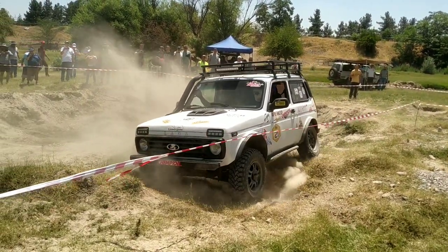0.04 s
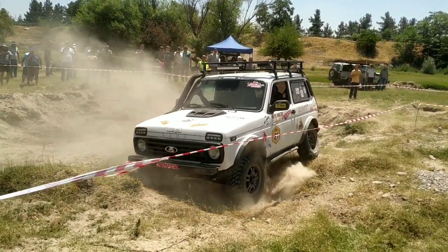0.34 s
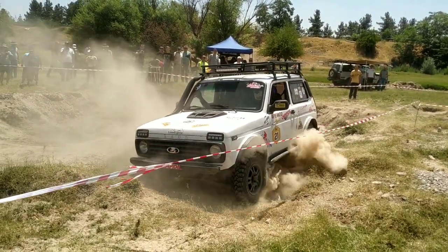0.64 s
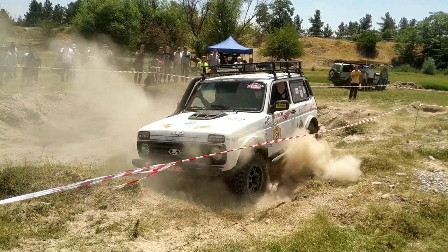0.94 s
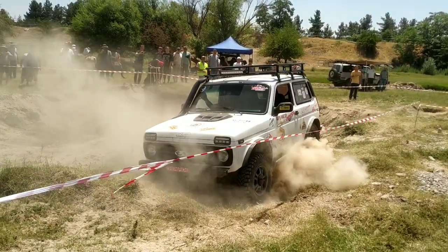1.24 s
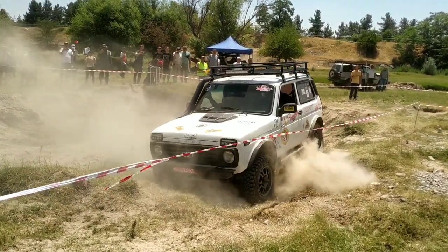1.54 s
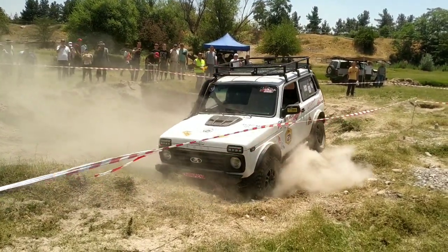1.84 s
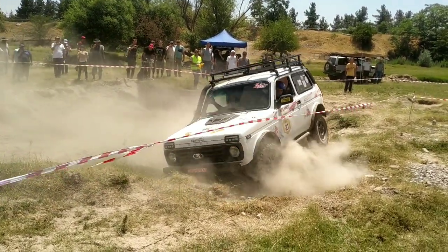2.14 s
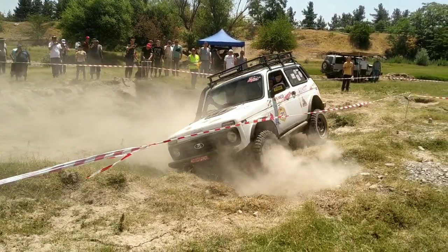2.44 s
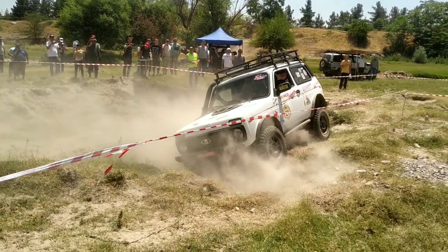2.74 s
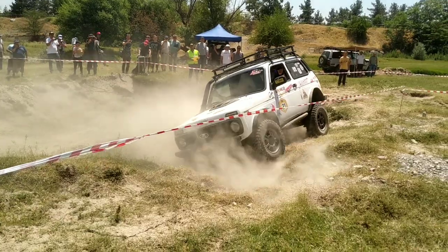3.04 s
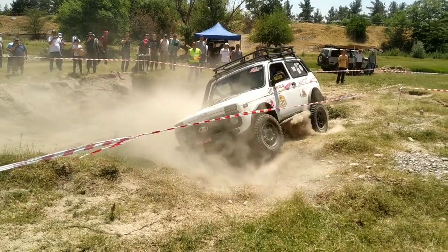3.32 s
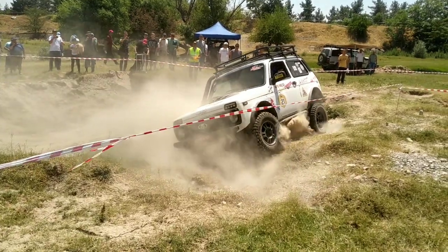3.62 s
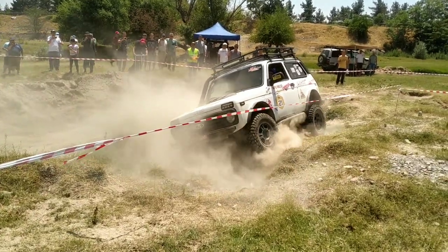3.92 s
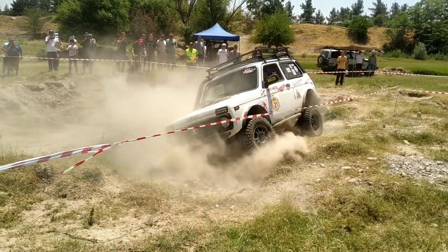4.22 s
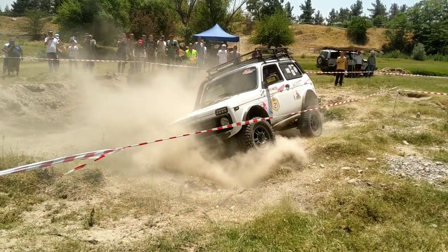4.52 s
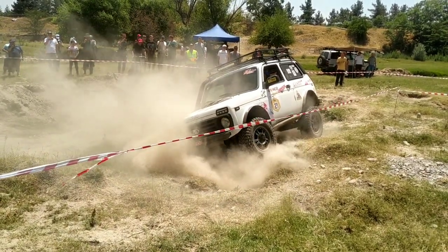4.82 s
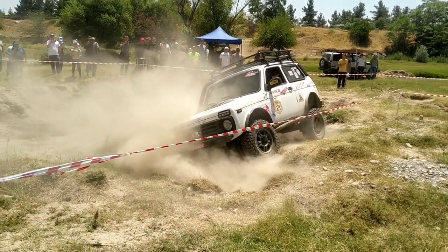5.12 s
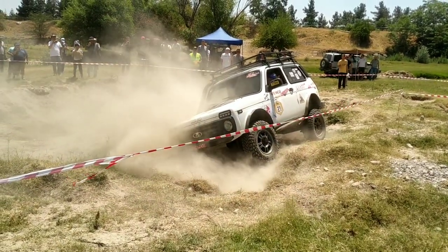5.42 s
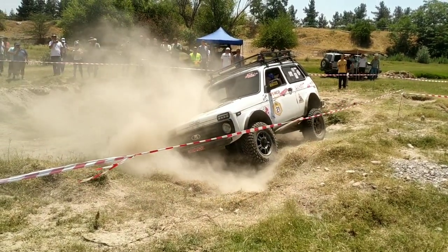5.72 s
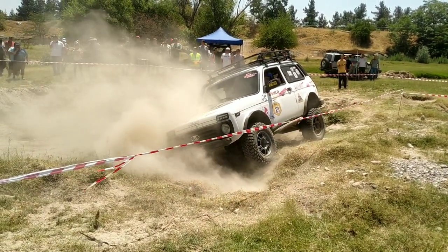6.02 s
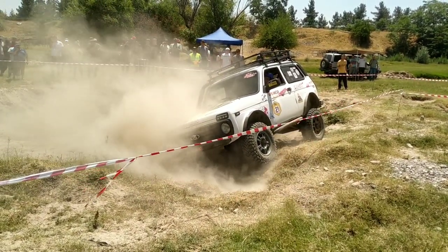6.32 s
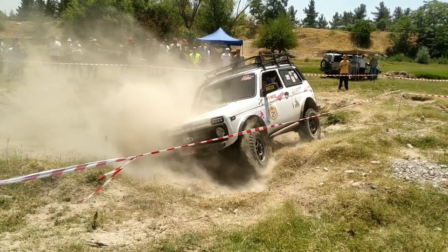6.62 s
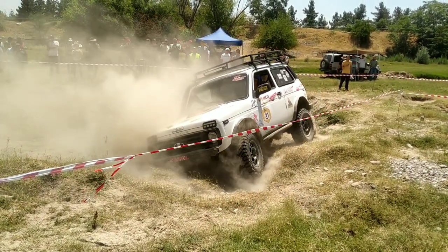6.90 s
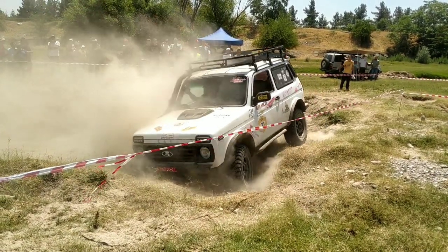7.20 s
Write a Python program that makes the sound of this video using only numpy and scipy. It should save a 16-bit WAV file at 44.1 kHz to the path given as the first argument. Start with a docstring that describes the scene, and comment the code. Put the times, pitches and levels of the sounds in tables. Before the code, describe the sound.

A small off-road car revs hard a few metres away, slightly to the right, with a booming exhaust, engine clatter, hiss and a whine. Its tyres scrub and spray dry grit, then the revs sink and stones crack against the body. A second, wavering rev brings brief squeals before the engine drops to idle, and a third rev climbs at the end. Outdoor wind rumbles and thumps on the microphone from the first drop onward.

```python
"""Off-roader climbing out of a dirt hollow

A small four-cylinder, a few metres off and a little to the right, revs three times and idles between. The
exhaust booms at the firing rate, the engine clatters and hisses, and its alternator whines. Spinning tyres
scrub and fling dry dirt and stones, and brief squeals ring out. Wind buffets the microphone's two ports."""
import sys
import numpy as np
from scipy import signal
from scipy.fft import rfft, irfft, next_fast_len
from scipy.io import wavfile
from scipy.ndimage import uniform_filter1d

SR = 44100
rng = np.random.default_rng(int(sys.argv[2]) if len(sys.argv) > 2 else 0)


def inscribe(sig):
    """Save sig as 16-bit PCM at rate SR to the path in sys.argv[1].

    A 1-D sig is mono; a 2-D sig holds one channel per row.
    Samples are clipped to [-1, 1] before scaling.
    """
    pcm = np.round(np.clip(np.atleast_2d(sig).T, -1, 1) * 32767)
    wavfile.write(sys.argv[1], SR, pcm.astype(np.int16))


N = 324576
T = np.arange(N) / SR
WORKING_HZ = 100  # firing rate that the engine's levels refer to

# Tone of an eddy striking a microphone port. Each row: frequency in Hz, gain in dB.
EDDY_SPECTRUM = [(30, 6.5), (150, 7), (400, -3), (1150, -13), (2600, -49)]


def undb(db):
    """Decibels to gain."""
    return 10 ** (np.asarray(db) / 20)


def curve(table):
    """Rows of (seconds, value), joined by straight lines."""
    return np.interp(T, *np.array(table, float).T)


def unit(x):
    """Scale to rms 1."""
    return x / np.sqrt(np.mean(x ** 2))


def tone(turns):
    """Sine of rms 1."""
    return np.sqrt(2) * np.sin(2 * np.pi * turns)


def colour(x, points):
    """Causal filter with the given (Hz, dB) response."""
    hz, db = np.array(points, float).T
    size = next_fast_len(x.shape[-1] + 8192, True) // 2 * 2
    bin_hz = np.arange(size // 2 + 1) * SR / size
    log_gain = np.log(undb(np.interp(np.log(bin_hz + 1), np.log(hz), db)))
    cepstrum = irfft(log_gain)
    cepstrum[1:size // 2] *= 2
    cepstrum[size // 2 + 1:] = 0
    return irfft(rfft(x, size) * np.exp(rfft(cepstrum)))[..., :x.shape[-1]]


def walk(rate):
    """Smooth random wander of rms 1, taking `rate` steps a second."""
    steps = rng.standard_normal(N // 10)
    path = np.interp(T * rate, np.arange(len(steps)), steps)
    return unit(uniform_filter1d(path, int(SR / rate) + 1))


def clicks(times, sizes):
    """Impulses at the given moments."""
    at = np.round(times * SR).astype(int)
    inside = (at >= 0) & (at < N)
    return np.bincount(at[inside], sizes[inside], N)


def pair(make, alike):
    """Two draws of a random sound, one for each port, partly blended."""
    both = np.array([make(), make()])
    return unit(both + alike * both[::-1])


def scatter(x, t60, wet_db):
    """Dense short reflections from metal and ground, different for each port."""
    t = T[:SR // 4]
    tails = rng.standard_normal((2, len(t))) * undb(-60 * t / t60)
    tails /= np.sqrt(np.sum(tails ** 2, axis=1, keepdims=True))
    return x + undb(wet_db) * signal.fftconvolve(x[None], tails, axes=1)[:, :N]


def firing_hz():
    """Engine speed: two revs, a spell of idling and a third rev."""
    # Each row, in all four: time in seconds, firing rate in Hz.
    first_rev = [(0.0, 116.7), (.21, 121.5), (.35, 136.3), (.42, 139.7), (.59, 128.1), (.71, 130),
                 (.82, 119.7), (.98, 127.2), (1.15, 118.1), (1.61, 93.9), (1.95, 75.02), (2.28, 63.95),
                 (2.57, 56.93), (2.76, 50.3)]
    second_rev = [(2.81, 56.65), (2.916, 75.1), (3.016, 89.07), (3.208, 83.3), (3.406, 100.9),
                  (3.556, 91.54), (3.676, 102.4), (3.876, 73.2), (4.3, 55.8)]
    idle = [(4.48, 45.14), (6.09, 43.02)]
    third_rev = [(6.175, 63), (6.302, 91.2), (6.462, 105.8), (6.666, 84.3), (6.84, 92.55), (6.998, 86.7),
                 (7.094, 94.85), (7.226, 116.6), (7.36, 123.9)]
    return curve([*first_rev, *second_rev, *idle, *third_rev])


def overrun():
    """0 while the accelerator is held down, 1 while it is released."""
    # Accelerator down. Each row: start and end in seconds.
    presses = [(-1, 1.317), (3, 3.88), (6.5, 8)]
    held = sum((T > start) & (T < end) for start, end in presses)
    return uniform_filter1d(1. - held, SR // 6)


def effort(db, db_per_octave, overrun_db, idle_db):
    """Gain of an engine noise: it grows with speed from an idling floor and eases off the throttle."""
    octaves = np.log2(firing_hz() / WORKING_HZ)
    return undb(db + db_per_octave * octaves + overrun_db * overrun()) + undb(idle_db)


def silencer_db(pull_db=2.5, full_pull_hz_per_s=480):
    """The silencer booms most at middle speeds; a hard pull swells it, and now and then it drops out."""
    # The silencer's response. Each row: firing rate in Hz, level in dB.
    response = [(44, -22), (51, -17), (61, -14.5), (84, -12), (96, -14), (108, -20), (124, -22.5),
                (140, -18.5)]
    # Brief dips in the boom. Each row: centre in seconds, depth in dB, half width in seconds.
    dropouts = [(.58, -10, 0.033), (2.79, -16, 0.021), (3.69, -6, 0.022), (4.32, -9, 0.12)]
    hz, db = np.array(response, float).T
    pickup = np.gradient(firing_hz()) * SR
    pull = uniform_filter1d(np.clip(pickup / full_pull_hz_per_s, 0, 1), SR // 20)
    dips = sum(depth * np.exp(-((T - centre) / width) ** 2 / 2) for centre, depth, width in dropouts)
    return np.interp(firing_hz(), hz, db) + pull_db * pull + dips


def exhaust(firings, open_hz=94.5, overrun_db=-6):
    """The silencer leaves a nearly pure, uneven boom; overtones come up as the throttle opens."""
    # The pipe's other notes. Each row: multiple of the firing rate, relative level in dB.
    orders = [(.5, -26.5), (2, -29.5), (3, -34), (4, -40), (7, -42.5)]
    rate, easing = firing_hz(), overrun()
    strength = np.minimum(rate / open_hz, 1) ** 1.57
    strength *= np.minimum(WORKING_HZ / rate, 1) ** 2  # the silencer swallows the higher notes
    # Near idle the firings stumble, and the pipe rings at twice their rate.
    idling = np.clip((54 - rate) / 8, 0, 1)
    stumble = firings + (.009 + .1 * idling) * walk(25)
    boom = (tone(stumble) * (1 - .75 * idling) + .45 * idling * tone(2 * stumble)) * undb(silencer_db())
    overtones = 0
    for multiple, db in orders:
        gain = undb(db + overrun_db * easing + 3 * walk(30))
        uneven_firings = firings + .012 * walk(60)
        overtones += gain * tone(multiple * uneven_firings + rng.random())
    return boom * undb((.7 + .5 * idling) * walk(40)) + overtones * strength


def clatter(firings, count=96):
    """Valves, pistons and chain knock at the same crank angles in every cycle of four firings."""
    # Tone of the engine bay. Each row: frequency in Hz, gain in dB.
    bay = [(30, 7), (140, 1), (260, -6), (390, -8), (680, -3.5), (950, -9), (1270, -4.5), (1650, -9.5),
           (1900, -6.5), (2040, -13), (2280, -6), (2900, -9), (3400, -17), (7000, -48.5)]
    angles, weights = rng.random(count), rng.standard_normal(count)
    cycles = np.arange(N // 1000)[:, None]
    slip, force = rng.standard_normal((2, len(cycles), count))
    times = np.interp(4 * (cycles + angles), firings, T, right=-1) + .00003 * slip
    knocks = clicks(times.ravel(), (weights * undb(2 * force)).ravel())
    knocks = unit(knocks / np.sqrt(firing_hz()))
    intake_rush = unit(rng.standard_normal(N) * (1 + .047 * np.cos(2 * np.pi * firings)))
    return unit(colour(scatter(knocks + .75 * intake_rush, t60=.025, wet_db=-10), bay))


def alternator(firings, turns_per_firing=.745):
    """A belt-driven whine rings the engine bay and fades at low speed; load shifts its notes' balance."""
    # Alternator and fan. Each row: multiple of the shaft rate, relative dB pulling and winding down.
    notes = [(10, -4, -4), (15, -16, -1.5), (20, -12, -6), (25, -6, -8), (30, -6, -10), (36, -3, -7)]
    # Panels that ring as the whine glides past. Each row: frequency in Hz, gain in dB.
    panels = [(500, -2), (680, 0), (850, -13.5), (1180, 1.5), (1600, -5), (2230, -4), (2480, -8),
              (2700, -13), (3200, -16)]
    shaft, easing = turns_per_firing * firings, overrun()
    whine = 0
    for multiple, pulling, coasting in notes:
        gain = undb(pulling + (coasting - pulling) * easing + 3.5 * walk(22))
        belt_flutter = np.sqrt(15 * multiple) * .012 * walk(70)
        whine += gain * tone(multiple * shaft + belt_flutter)
    return undb(-5.5) * np.minimum(firing_hz() / WORKING_HZ, 1) * colour(whine, panels)


def hiss(firings):
    """Air and belts hiss; a tappet ticks through once a crank turn."""
    # Tone of the hiss. Each row: frequency in Hz, gain in dB.
    spectrum = [(2500, 3.5), (3500, 1.5), (4500, -10.5), (5600, -0.5), (7300, 8), (8500, 1), (9900, 4.5),
                (11000, -1.5), (12400, 2.5), (15000, -20)]
    tappet = np.exp(-(firings / 2 % 1) / .36) * undb(5 * walk(30))
    return unit(colour(rng.standard_normal(N) * (1 + 35 / firing_hz() * tappet), spectrum))


def grit(count=50000):
    """Thousands of dry grains spray off the spinning wheels."""
    when, polarity, rarity = rng.random((count, 3)).T
    sizes = np.sign(polarity - .5) * undb(-3 * np.log(rarity + .002))
    return colour(clicks(when * N / SR, sizes), [(2000, -21), (4000, -9.5), (9000, -18), (15000, -58)])


def dirt(drive, fade_s=.041):
    """The tyres shed a little grit as the engine works, and a surging spray while a wheel spins."""
    # Wheelspins in loose dirt. Each row: start in seconds, length in seconds, level in dB.
    wheelspins = [(0.267, 0.54, -40), (3.05, 0.769, -56)]
    spray = sum(undb(db) * np.exp(-np.abs(T - np.clip(T, start, start + length)) / fade_s)
                for start, length, db in wheelspins)
    return (drive * undb(-13) + spray * undb(2 * walk(28))) * pair(grit, alike=.29)


def eddies(count=1600, band_hz=(90, 315)):
    """Small eddies hit a port in bunches, most of them faint and dull."""
    when, force = rng.random((count, 2)).T
    sizes = np.cos(np.pi * np.arange(count)) * undb(16 * force ** 3)
    bunching = undb(5 * np.minimum(walk(22), 1))
    hits = clicks(when * N / SR, sizes) * bunching
    band = signal.butter(2, band_hz, "band", fs=SR, output="sos")
    return colour(signal.sosfilt(band, hits), EDDY_SPECTRUM)


def wind():
    """Turbulence rumbles and flutters at each port almost independently."""
    # Wind on the microphone. Each row: time in seconds, relative level in dB.
    strength = [(0, -39), (1.2, -45), (1.45, -25), (1.92, -21), (2.7, -31), (3.3, -25), (3.95, -20),
                (4.7, -18.5), (5.3, -23.5), (5.75, -20.5), (6.7, -21), (7.36, -22.5)]
    # Tone of the rumble. Each row: frequency in Hz, gain in dB.
    spectrum = [(30, 0.5), (80, -2.5), (150, -13.5), (300, -27), (900, -71.5)]
    rumble = pair(lambda: colour(rng.standard_normal(N) * undb(2.2 * walk(12)), spectrum), alike=.04)
    flutter = pair(eddies, alike=.074)
    return (undb(4) * rumble + undb(-6.5) * flutter) * undb(curve(strength))


def tyres(attack_s=.019, sag_hz_per_s=920, hard_slip_db=-15):
    """Tread blocks stick and slip: a rough falling squawk over the jerky rasp of the carcass."""
    # Slips on hard ground. Each row: start and length in seconds, level in dB, judder pitch in Hz,
    # share of clean squawk from 0 to 1.
    scrubs = [(0.291, 0.062, -16, 711, 0.5), (0.387, 0.085, -19.5, 580, 0.18),
              (0.62, 0.074, -17.5, 741, 0.96), (0.726, 0.022, -13, 535.6, 0.41),
              (0.984, 0.12, -18.5, 790, 0.3), (7.291, 0.073, -25, 659, 0.9)]
    # Tone of the carcass. Each row: frequency in Hz, gain in dB.
    carcass = [(150, -2.5), (390, -10.5), (520, -1), (860, -3.5), (3000, -32.5)]
    waver = 1 + .035 * walk(170) + .04 * walk(35)  # the pitch wavers as the grip changes
    flutter = undb(1.8 * walk(60))
    rasp = unit(colour(rng.standard_normal(N) * undb(3.3 * walk(260)), carcass))
    out = 0
    for start, length, db, hz, clean in scrubs:
        age, release_s = T - start, .36 * length
        envelope = np.exp(np.minimum(age, 0) / attack_s - np.maximum(age - length, 0) / release_s)
        turns = np.cumsum((hz - sag_hz_per_s * np.clip(age, 0, length)) * waver) / SR
        doubling = np.clip((db - hard_slip_db) / 2, 0, 1)  # a hard slip stresses every second judder
        squawk = (tone(turns) + doubling * tone(3 * turns / 2)) * flutter
        out += undb(db) * envelope * (np.sqrt(clean) * squawk + np.sqrt(1 - clean) * rasp)
    return out


def buffets(rise_s=.014, fall_s=.036, lean_db=12):
    """A strong eddy flutters up, slaps one port or both, and rattles away; some are dull, some sharp."""
    # Thumps on the microphone. Each row: time in seconds, relative level in dB, upper edge in Hz, port.
    thumps = [(1.424, -21, 400, "left"), (1.65, -14.5, 333, "both"), (1.855, -15.5, 400, "left"),
              (3.655, -12.5, 1000, "left"), (3.712, -14, 500, "left"), (3.834, -12.5, 605.5, "left"),
              (4.0, -14.5, 1300, "left"), (4.08, -11, 499, "left"), (4.184, -20.5, 601, "left"),
              (4.389, -15, 898, "left"), (4.473, -14.5, 940, "left"), (4.538, -14, 1200, "left"),
              (4.74, -16.5, 600, "right"), (4.777, -15.5, 1700, "left"), (4.829, -17.5, 449.6, "left"),
              (4.904, -18, 800, "left"), (4.942, -19.5, 1296, "left"), (4.976, -19.5, 654, "both"),
              (5.033, -20, 500, "left"), (5.594, -14.5, 400, "right"), (5.772, -8, 750, "both"),
              (5.937, -20, 350, "left"), (6.025, -25, 750, "left"), (6.37, -14, 809.5, "left"),
              (6.519, -14, 500.7, "left"), (6.8, -16, 597.6, "left")]
    out = np.zeros((2, N))
    age = T[:SR // 4] - T[SR // 20]
    flutter = undb(-11.5) * np.exp(np.minimum(age / rise_s, -age / fall_s))
    slap = (age >= 0) * np.exp(-np.abs(age) / .003)
    for time, db, edge_hz, port in thumps:
        side = (port == "left") - (port == "right")
        lean = undb(lean_db / 2 * side * np.array([[1], [-1]]))
        rattle = unit(undb(5 * np.repeat(rng.standard_normal(len(age)), SR // 200)[:len(age)]))
        eddy = colour(rng.standard_normal((2, len(age))) * (slap + flutter * rattle), EDDY_SPECTRUM)
        thump = signal.sosfilt(signal.butter(3, edge_hz, fs=SR, output="sos"), eddy)
        thump /= thump.std(axis=1, keepdims=True)
        at = int((time + age[0]) * SR)
        out[:, at:at + len(age)] += undb(db - 14) * lean * thump[:, :N - at]
    return out


def stones():
    """A stone cracks against steel at once and rings; a shower of dirt builds up and crunches out."""
    # Hits on the body. Each row: start in seconds, relative peak in dB, ring in Hz, decay in seconds.
    hits = [(1.84, -23, 3885, .012), (1.865, -18, 2370, 0.18), (1.944, -20, 2394, 0.012),
            (1.963, -13.5, 1550, 0.021), (2.068, -8.5, 8200, 0.015), (2.467, -24, 2771, 0.064),
            (3.073, -17.5, 3170, 0.061), (3.449, -23.5, 8436, 0.4), (5.593, -28, 9230, 0.013)]
    # Tone of grit on steel. Each row: frequency in Hz, gain in dB.
    steel = [(400, 12), (3000, 1), (10000, -1.5), (15000, -45)]
    out = np.zeros((2, N))
    t = T[:SR // 2]
    for start, db, hz, t60 in hits:
        envelope = undb(-60 * t / t60) * (1 - np.exp(-4 * t / t60 ** 1.5))
        crunch = undb(2.5 * np.repeat(rng.standard_normal(len(t)), 40)[:len(t)])
        noise = rng.standard_normal(len(t)) + rng.standard_normal((2, len(t)))
        crack = colour(noise * envelope * crunch, steel)
        ring = signal.lfilter(*signal.iirpeak(hz, 5, fs=SR), crack)
        hit = crack + undb(7) * (hz / 3000) ** 1.5 * ring  # higher notes ring out more
        at = int(start * SR)
        out[:, at:at + len(t)] += undb(db + 5) * hit / np.abs(hit).max()
    return out


def squeals(half_width_s=.022, sag_per_s=.4):
    """Each squeal swells, rasps, sags and dies in about a tenth of a second."""
    # Squeals in the second rev. Each row: centre in seconds, pitch in Hz, level in dB.
    chirps = [(3.2, 2250, -35), (3.3, 685, -28.5), (3.4, 2690, -33), (3.442, 2215, -29),
              (3.695, 2680, -30), (3.781, 2670, -30.5), (3.881, 710, -33.5)]
    waver, rasp = 1 + .011 * walk(200), unit(undb(3 * walk(130)))
    out = 0
    for centre, hz, db in chirps:
        age = T - centre
        envelope = np.exp(-(age / half_width_s) ** 2 / 2)
        turns = np.cumsum(hz * (1 - sag_per_s * age) * waver) / SR
        out += undb(db) * rasp * envelope * tone(turns)
    return out


def ports(car, lag_s=.0001102):
    """The car stands a little to the right: the left port hears it later, and each has its own colour."""
    # Balance of the ports. Each row: frequency in Hz, left minus right in dB.
    balance = [(80, -0.5), (250, -2), (700, -0.5), (1300, -2), (2400, 5), (4500, 2), (6500, -7), (9000, 7)]
    left = colour(np.interp(T - lag_s, T, car[0]), [(hz, db / 2) for hz, db in balance])
    right = colour(car[1], [(hz, -db / 2) for hz, db in balance])
    return np.array([left, right])


def scene():
    """The car from a few metres away, with wind right on the microphone."""
    firings = np.cumsum(firing_hz()) / SR
    drive = effort(db=-25, db_per_octave=20.5, overrun_db=-2.5, idle_db=-49)
    engine = exhaust(firings) + drive * (clatter(firings) + alternator(firings))
    airflow = effort(db=-32.5, db_per_octave=9.5, overrun_db=-4.5, idle_db=-59)
    air = airflow * pair(lambda: hiss(firings), alike=.013)
    car = engine + air + dirt(drive) + tyres() + squeals()
    return ports(car) + stones() + wind() + buffets()


def record(dry):
    """The recorder clips the highest peaks and cuts the treble above 15 kHz."""
    lowpass = signal.ellip(8, .2, 70, 15000, fs=SR, output="sos")
    return signal.sosfilt(lowpass, np.clip(dry, -.95, .95))


dry = scene()
out = record(dry)
inscribe(out)
```